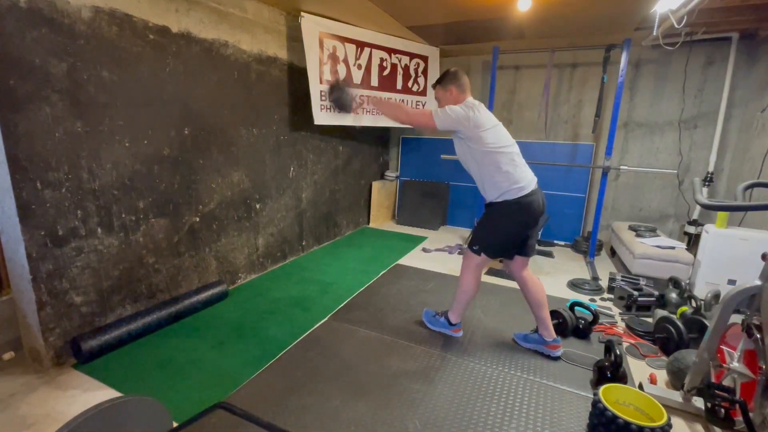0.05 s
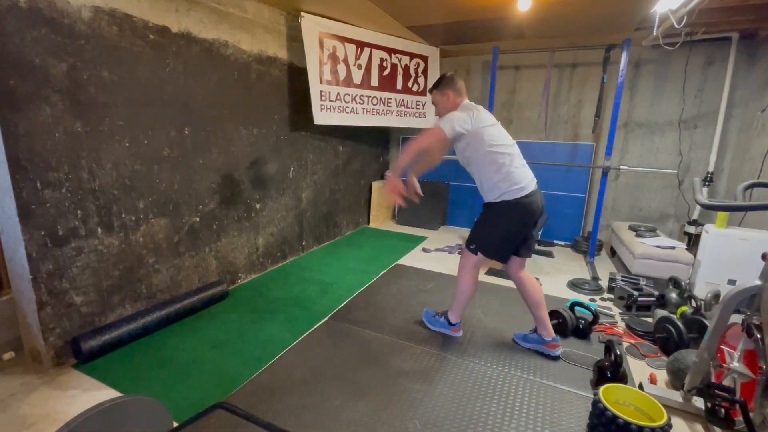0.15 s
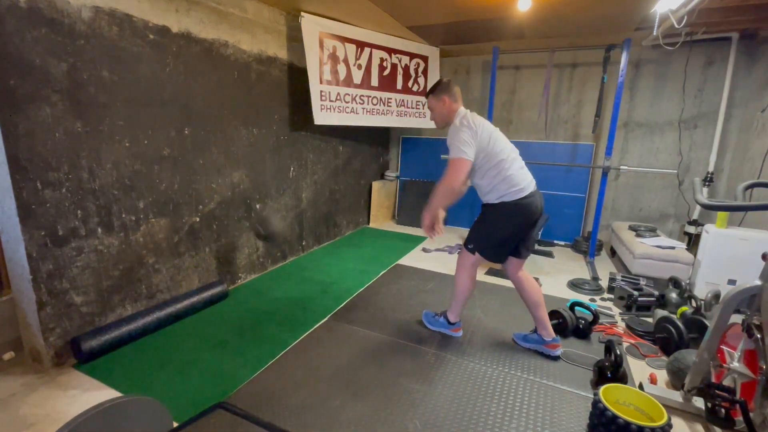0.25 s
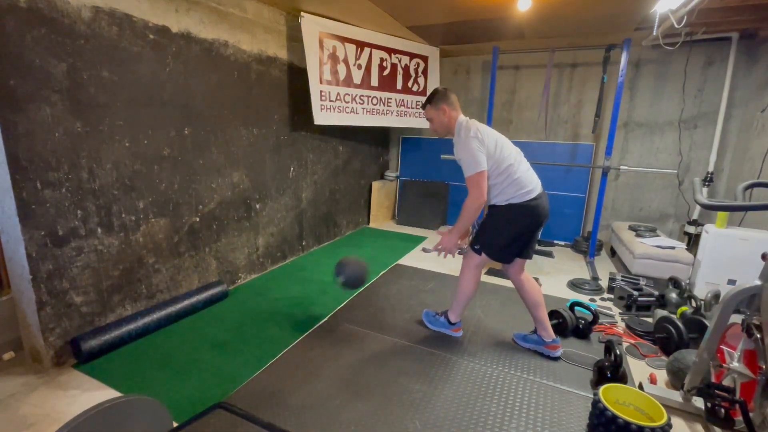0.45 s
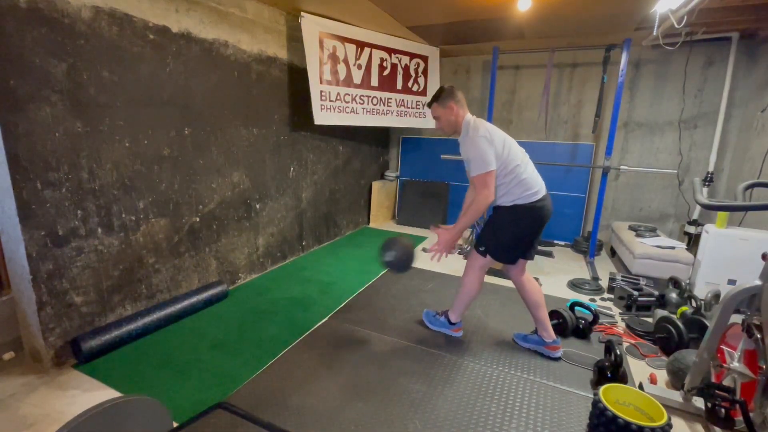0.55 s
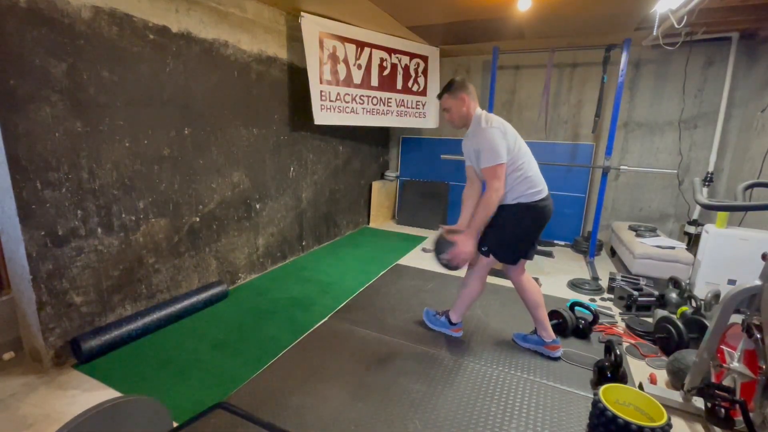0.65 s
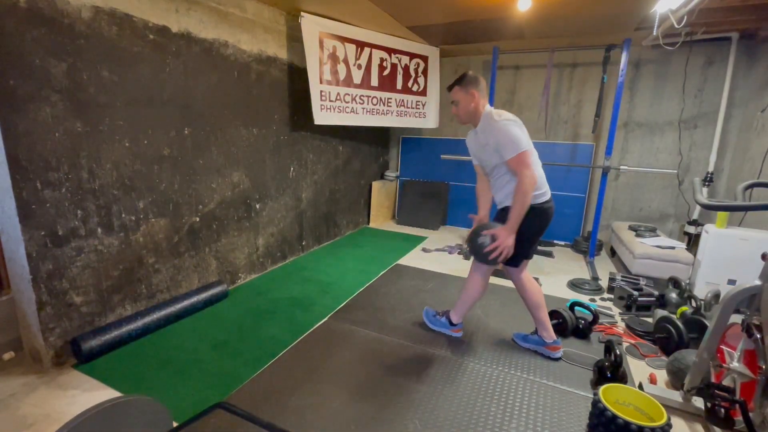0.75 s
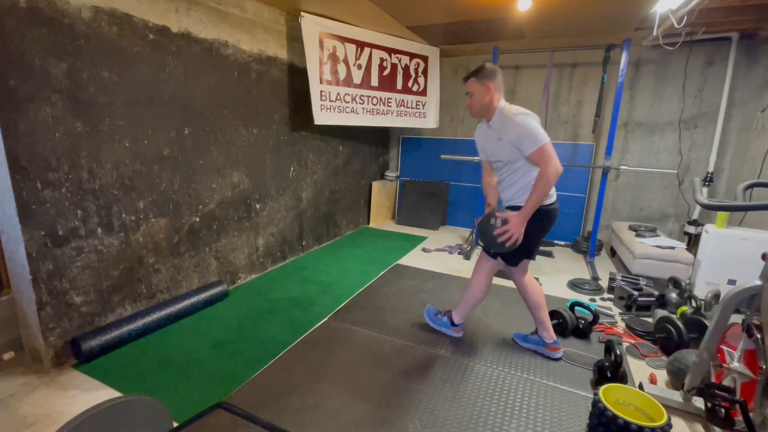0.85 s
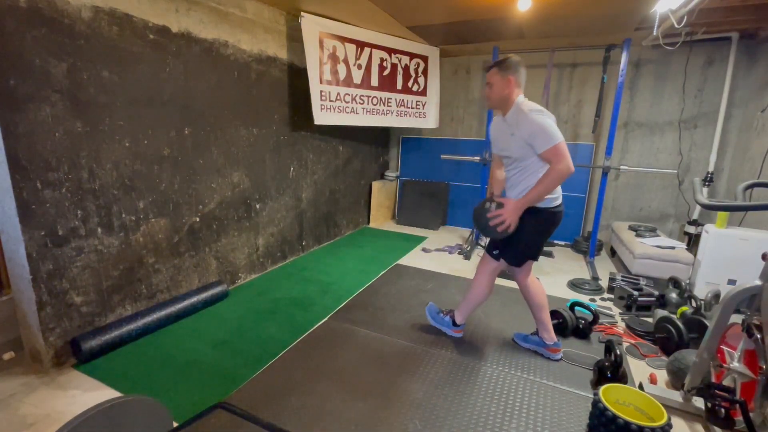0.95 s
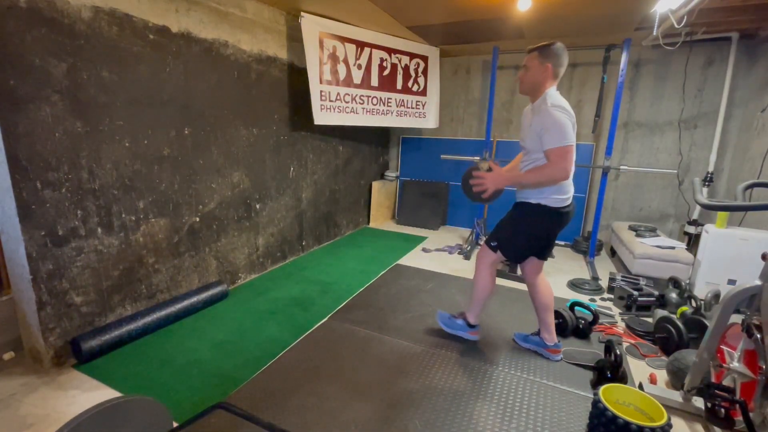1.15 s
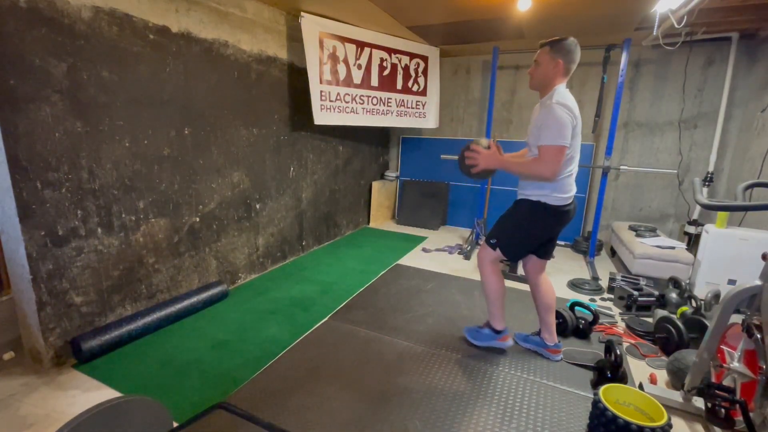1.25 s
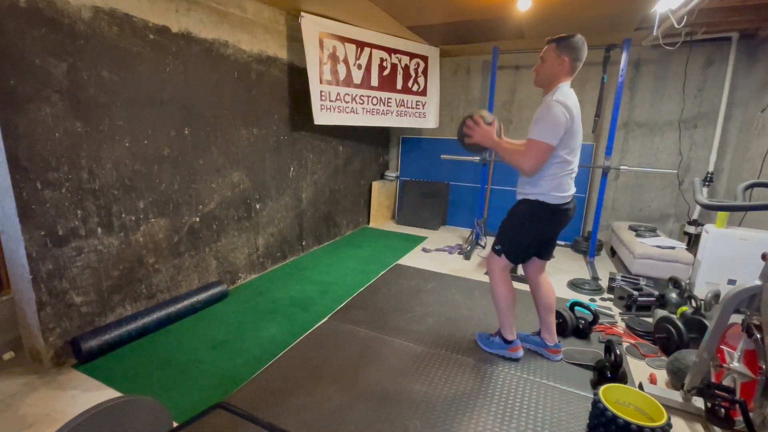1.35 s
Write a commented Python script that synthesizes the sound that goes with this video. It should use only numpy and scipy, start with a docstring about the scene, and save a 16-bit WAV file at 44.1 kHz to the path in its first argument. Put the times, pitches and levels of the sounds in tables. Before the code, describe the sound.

A heavy rubber ball slams a wall, thuds on the floor and is caught.

```python
"""A garage with a matted floor, on a stereo pair with the left microphone nearer the concrete wall.
A heavy rubber ball is thrown against the wall, drops on the floor and is caught. Each blow rings the
shell and fills the hard room: loud for a few hundredths of a second, then dropping to a quieter ring.
Hands rub the rubber and shoes scuff over a faint rustle, microphone hiss and a low building rumble."""
import sys
import numpy as np
from scipy import signal
from scipy.fft import rfft, irfft, next_fast_len
from scipy.io import wavfile
from scipy.ndimage import uniform_filter1d

SR = 44100
rng = np.random.default_rng(int(sys.argv[2]) if len(sys.argv) > 2 else 0)


def generate_wav(signal):
    """Clip the signal to [-1, 1] and save it as 16-bit WAV at the path in sys.argv[1]."""
    frames = np.transpose(np.atleast_2d(signal))
    scaled = np.clip(frames, -1, 1) * 32767
    pcm = np.round(scaled).astype(np.int16)
    wavfile.write(sys.argv[1], SR, pcm)


N = 61739


def ball():
    """Each blow flexes the rubber, rings the shell and sets off the room's reverberation and boom."""
    # Blows on wall, floor and palms: (time [s], rise [s])
    blow_times = [(.2063, .0007), (.3775, .0025), (.678, .002)]
    # The same blows: (room [dB], loud hold [s], rubber [dB], shell at first [dB], shell after [dB],
    # boom at first [dB], boom after [dB])
    blows = [(-14, 0.026, -16.5, -18, -27, -14, -18), (-16.5, 0.048, -26, -21.5, -23.5, -21.5, -22.5),
             (-37.5, 0.0099, -37, -36.5, -41, -62, -41)]
    # What each blow sends into the room: (frequency [Hz], relative level [dB])
    wall = [(94, -35), (160, -13.5), (331, -5.5), (814, -9.5), (985, -6.5), (1260, -15), (1560, -15),
            (1650, -16), (2330, -18.5), (6310, -28.5), (15500, -45)]
    floor = [(65, -42.5), (110, -8), (156, -16.5), (287, -5.5), (547, -9.5), (622, -13), (790, -11),
             (1100, -15), (2140, -26), (9000, -70.5), (11700, -96), (19800, -120)]
    palms = [(110, -36), (190, -6), (320, 0), (600, -2), (860, -4), (1000, -14), (1600, -20), (2600, -43),
             (4400, -120)]
    # Flexing rubber: (frequency [Hz], relative level [dB])
    rubber = [(100, -35), (170, -19), (356, 2.5), (798, -8.5), (973, -6.5), (1960, -14.5), (3500, -37),
              (4000, -34.5), (5200, -50), (8800, -120)]
    # Modes of the shell and low modes of the garage: (frequency [Hz], relative level [dB], t60 [s])
    shell_modes = [(215, -8, .45), (284, -6, .45), (298, 0, .7), (350, -5, .22), (400, -5, .18),
                   (470, -7, .2), (550, -3, .12), (790, -9, .1), (965, -9, .12), (1240, -12, .12)]
    room_modes = [(51.45, -1, 0.56), (62.8, 2, 0.17), (81.5, 1, 0.18), (117.4, -6.5, 0.2)]
    touch_s = .56  # fingertips brush the rising ball and still its ring
    out = np.zeros((2, N))
    for (start, rise), blow, spectrum in zip(blow_times, blows, (wall, floor, palms)):
        room_db, hold_s, rubber_db, first_db, after_db, thump_db, boom_db = blow
        age = np.clip(np.arange(N) / SR - start, 0, None)
        loud = gate(start, rise, hold_s, release=.004)
        ring = gate(start, rise, touch_s - start, release=.01) if start < touch_s else 1
        thump = gate(start, rise, hold_s, release=.0084)
        out += amp(room_db) * room_burst(spectrum, start, rise, hold=.015, patchy_db=.5)
        out += amp(rubber_db) * loud * noise(rubber, patchy_db=-.1)
        out += (amp(first_db) * loud + amp(after_db) * ring) * ringing(shell_modes, age, attack=.00053)
        out += (amp(thump_db) * thump + amp(boom_db)) * ringing(room_modes, age, attack=.008)
    return out


def rubs():
    """Skin and soles slide on rubber, and the room carries each rub on."""
    # Rubs: (time [s], level [dB], rise [s], hold [s], tilt [dB/octave])
    slides = [(0.565, -60.5, 0.00053, 0.0014, 8), (0.663, -35.5, 0.0092, .012, -0.5),
              (0.669, -41, 0.014, 0.057, 1.8), (1.1, -51, 0.02, 0.01094, 0.8),
              (1.317, -55, 0.0032, 0.062, -1.64)]
    # Friction noise: (frequency [Hz], relative level [dB])
    friction = [(180, -14), (300, -10.5), (519, -8), (1010, -18), (1090, -15), (2090, -13), (2680, -18.5),
                (8410, -21), (10600, -27.5), (13600, -31), (15800, -53)]
    out = np.zeros((2, N))
    for start, level_db, rise, hold, tilt in slides:
        tilted = [(hz, db + tilt * np.log2(hz / 2000)) for hz, db in friction]
        out += amp(level_db) * room_burst(tilted, start, rise, hold, patchy_db=3.5)
    return out


def scuff():
    """A shoe gives a soft, low scuff during the throw."""
    # Sliding sole: (frequency [Hz], relative level [dB])
    sole = [(200, -29.5), (300, -5.5), (450, 0), (700, -7.5), (1000, -11), (1500, -41)]
    return amp(-60) * room_burst(sole, start=.055, rise=.025, hold=.006, patchy_db=1.2)


def swish():
    """The swing of the throw makes a brief hiss."""
    # Swell of the swing: (time [s], level [dB])
    swing = [(0, -58.5), (.03, -55), (.065, -51.5), (.09, -58.5), (.125, -63.5), (.17, -79), (.2, -100),
             (1.4, -100)]
    # Its hiss: (frequency [Hz], relative level [dB])
    hiss = [(530, -35), (900, 0), (2010, -0.5), (2980, -7.5), (3980, -1.5), (5570, -7), (8270, -2),
            (14000, -10), (15800, -9.5)]
    return amp(curve(swing)) * noise(hiss, patchy_db=.9)


def rustle_and_hiss():
    """A faint rustle together with the microphones' high hiss."""
    # Swells of both: (time [s], level [dB])
    swells = [(0, -61.5), (.1, -61), (.16, -75), (.19, -53.5), (.36, -58.5), (.55, -61.5), (.65, -60),
              (.85, -59), (.93, -57.5), (1.02, -66), (1.1, -66.5), (1.2, -72), (1.28, -72.5), (1.4, -75)]
    # Rustle, with microphone hiss on top: (frequency [Hz], relative level [dB])
    spectrum = [(470, -35), (800, -2.5), (2000, -3.5), (3800, -10), (5500, -13), (6800, -7.5),
                (7700, -21.5), (8300, -4.5), (10000, -10.5), (10800, -23), (13500, -22.5), (15800, -30)]
    return amp(curve(swells)) * noise(spectrum, patchy_db=2.2)


def faint_tone():
    """A short, faint tone after the catch: a narrow band of noise."""
    pitch_hz, width_hz = 700, 70
    band = [(pitch_hz - width_hz, -60), (pitch_hz, 0), (pitch_hz + width_hz, -60)]
    return amp(-66) * gate(start=.925, rise=.012, hold=.075, release=.012) * noise(band, patchy_db=0)


def rumble():
    """The building rumbles, loudest around the blow on the wall."""
    # Swells of the rumble: (time [s], level [dB])
    swells = [(0, -57), (.1, -50.5), (.17, -68), (.19, -33.5), (.6, -52.5), (.72, -54.5), (.85, -61),
              (.93, -53), (1.02, -60), (1.1, -59), (1.22, -58.5), (1.3, -65), (1.4, -60)]
    # Building noise: (frequency [Hz], relative level [dB])
    building = [(15, -47.5), (25, -20), (70, 2.5), (140, -5), (310, -18.5), (345, -21), (465, -12.5),
                (697, -17), (900, -22.5), (1170, -45.5), (1980, -120)]
    return amp(curve(swells)) * noise(building, patchy_db=-3.65)


def ringing(modes, age, attack):
    """Damped modes, their levels a little different at each blow."""
    scatter_db = 1.5
    partials = (amp(db + rng.normal(0, scatter_db) - 60 * age / t60) * np.sin(2 * np.pi * hz * age)
                for hz, db, t60 in modes)
    return (1 - np.exp(-age / attack)) ** 2 * sum(partials)


def room_burst(spectrum, start, rise, hold, patchy_db):
    """A noise burst that dies away in the garage, each frequency at its own speed."""
    # Reverberation of the garage: (frequency [Hz], t60 [s])
    reverb_times = [(120, 0.47), (300, 0.45), (800, 0.39), (2000, 0.39), (5000, 0.31), (9000, 0.27),
                    (11000, .25), (15000, .2)]
    hz, t, bands = signal.stft(noise(spectrum, patchy_db), SR, nperseg=256)
    tail_s = np.clip(t - start - rise - hold, 0, None)
    decay = amp(-60 * tail_s / along(reverb_times, hz)[:, None])
    onset = gate(start, rise, hold=2, release=1)
    return signal.istft(bands * decay, SR, nperseg=256)[1][:, :N] * onset


def noise(spectrum, patchy_db):
    """Coloured stereo noise of rms 1, with patches of random gain in time and frequency."""
    # Likeness at the two microphones: (frequency [Hz], correlation [-1 to 1])
    likeness = [(40, .9), (90, 0.86), (200, 0.33), (400, 0.5), (800, 0.12), (2000, 0.0078), (5000, 0.038),
                (9000, 0.052), (11000, -0.84), (12500, 1)]

    def mid_side_gains(hz):
        angle = np.arccos(np.clip(along(likeness, hz), -1, 1)) / 2
        return amp(along(spectrum, hz)) * [np.cos(angle), np.sin(angle)]

    bands = signal.stft(rng.standard_normal((2, N)), nperseg=512)[2]
    patches = uniform_filter1d(rng.standard_normal(bands.shape[1:]), size=5, axis=0)
    patches = uniform_filter1d(patches, size=5, axis=1)
    pair = signal.istft(bands * amp(patchy_db * unit(patches)), nperseg=512)[1][:, :N]
    mid, side = filtered(pair, mid_side_gains)
    return unit(np.array([mid + side, mid - side]))


def gate(start, rise, hold, release):
    """Envelope: linear rise, hold, exponential release, all in seconds."""
    age = np.arange(N) / SR - start
    return np.clip(age / rise, 0, 1) * np.exp(-np.clip(age - rise - hold, 0, None) / release)


def filtered(x, response):
    """Filter x by a gain that is a function of frequency."""
    size = next_fast_len(N + SR // 2)
    return irfft(rfft(x, size) * response(np.fft.rfftfreq(size, 1 / SR)), size)[..., :N]


def along(points, hz):
    """Interpolate (frequency [Hz], value) points on a log axis."""
    freqs, values = np.transpose(points)
    return np.interp(np.log(hz + 1), np.log(freqs + 1), values)


def curve(points):
    """Interpolate (time [s], value) points at every sample."""
    return np.interp(np.arange(N) / SR, *np.transpose(points))


def amp(db):
    """Decibels to gain."""
    return 10 ** (np.asarray(db) / 20)


def unit(x):
    """Scale to rms 1."""
    return x / np.sqrt(np.mean(x ** 2) + 1e-20)


def scene():
    """Ball, thrower and background, in stereo."""
    return ball() + rubs() + scuff() + faint_tone() + rustle_and_hiss() + rumble() + swish()


def record(dry):
    """The microphone pair: deep bass is cut, peaks round off and the top treble is removed."""
    # The left microphone is nearer the wall: (frequency [Hz], left over right [dB])
    balance = [(40, 1), (700, 1.5), (1500, 3), (5000, 4.5), (10000, 2.5), (13000, 0)]
    bass_cut_hz, top_hz = 40, 15800
    ceiling, knee = .95, 5
    lean_left = lambda hz: amp(np.outer([.5, -.5], along(balance, hz)))
    bass_cut = lambda hz: (1j * hz / (bass_cut_hz + 1j * hz)) ** 2
    picked_up = filtered(dry, lambda hz: lean_left(hz) * bass_cut(hz))
    rounded = picked_up / (1 + np.abs(picked_up / ceiling) ** knee) ** (1 / knee)
    return filtered(rounded, lambda hz: hz < top_hz)


dry = scene()
out = record(dry)
generate_wav(out)
```